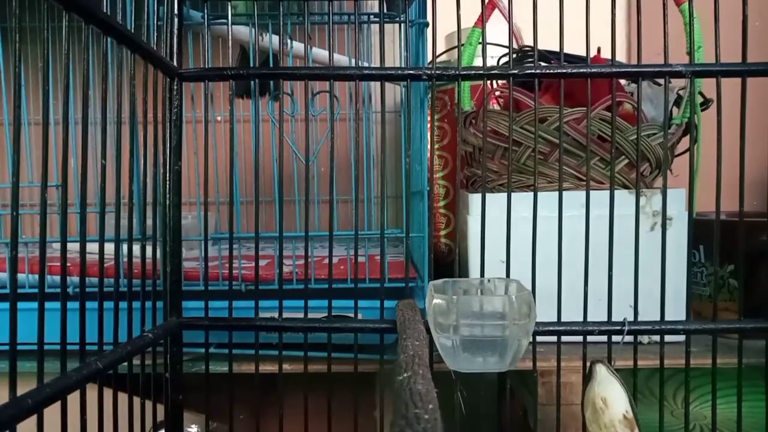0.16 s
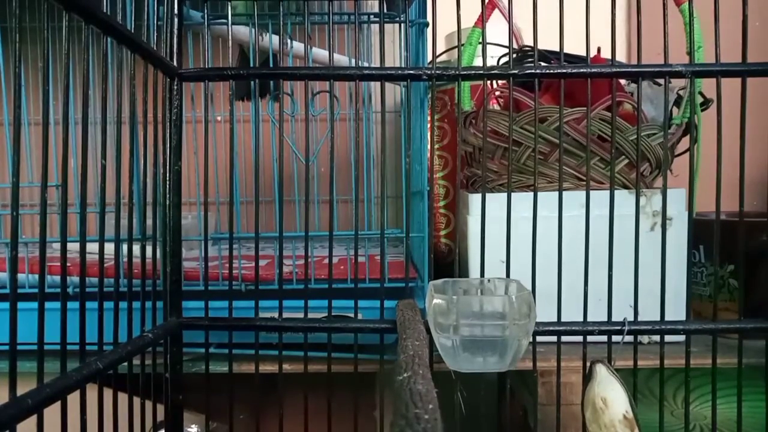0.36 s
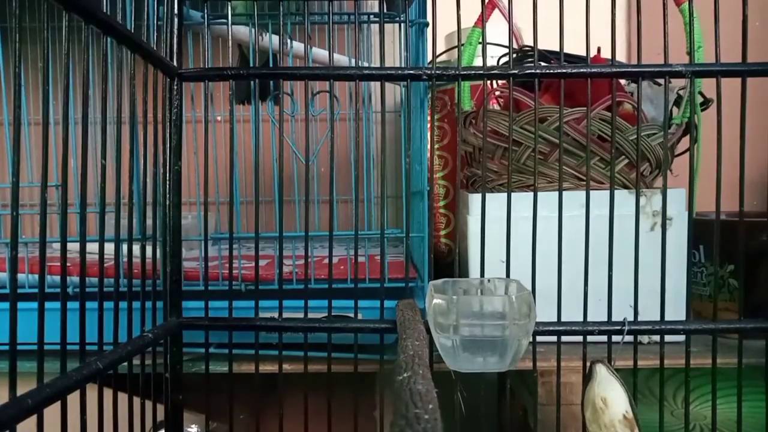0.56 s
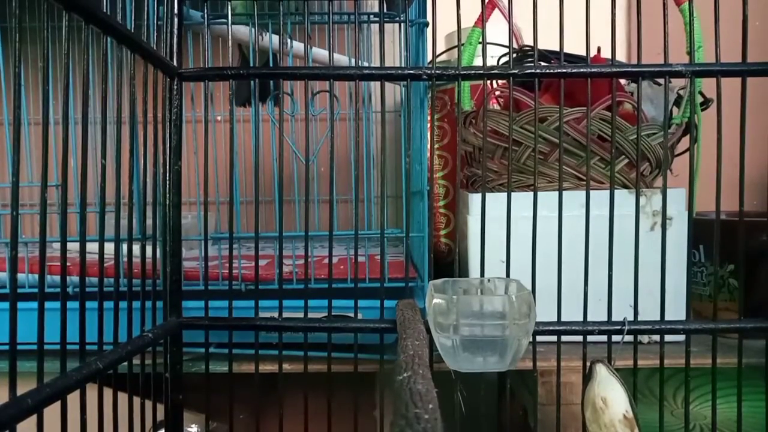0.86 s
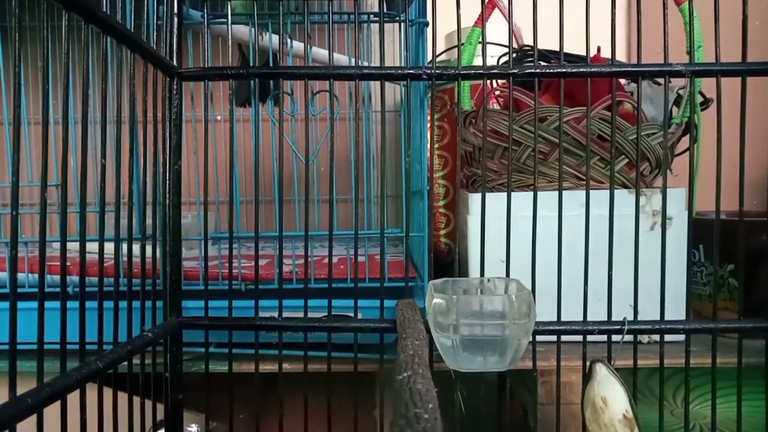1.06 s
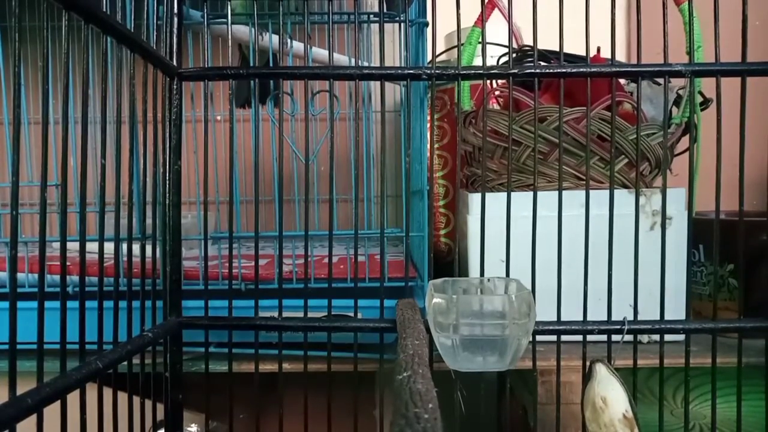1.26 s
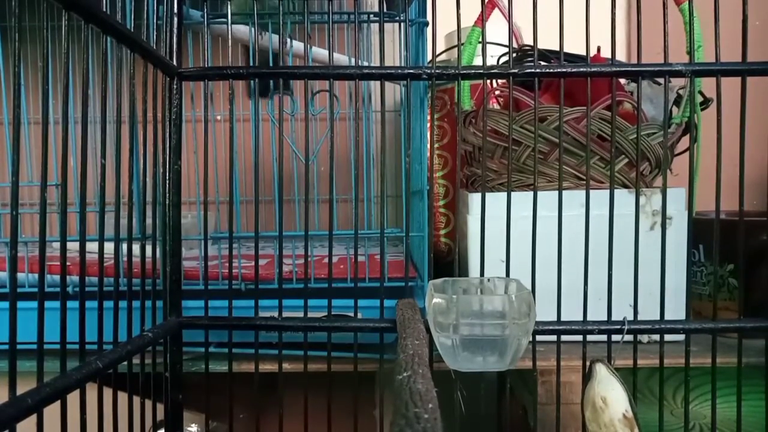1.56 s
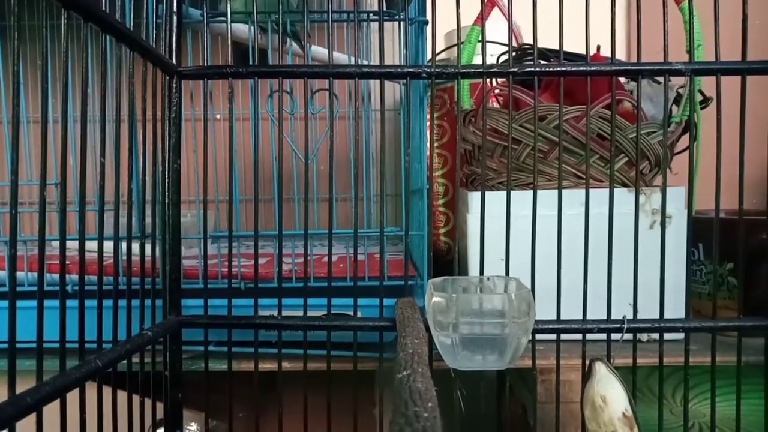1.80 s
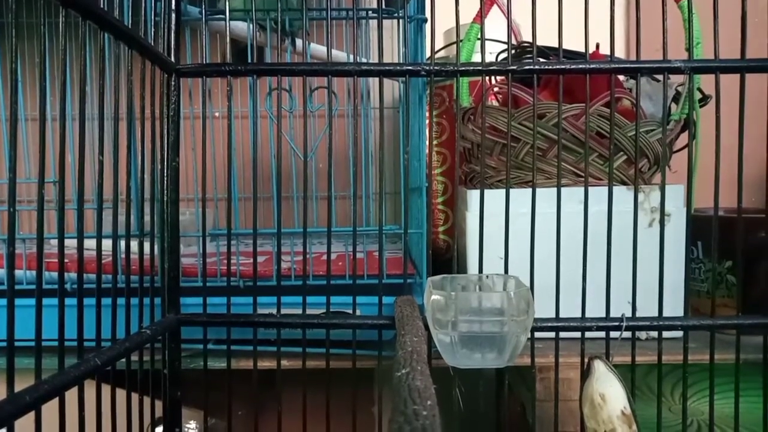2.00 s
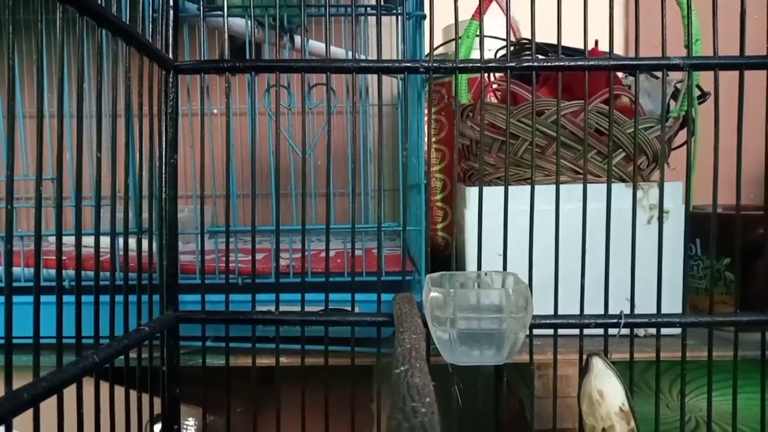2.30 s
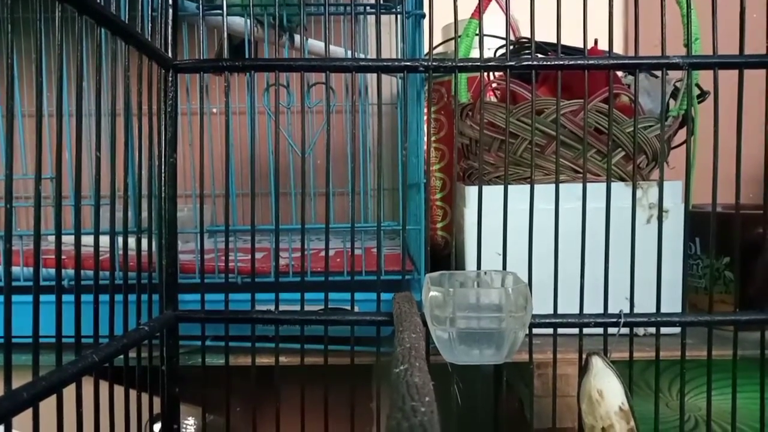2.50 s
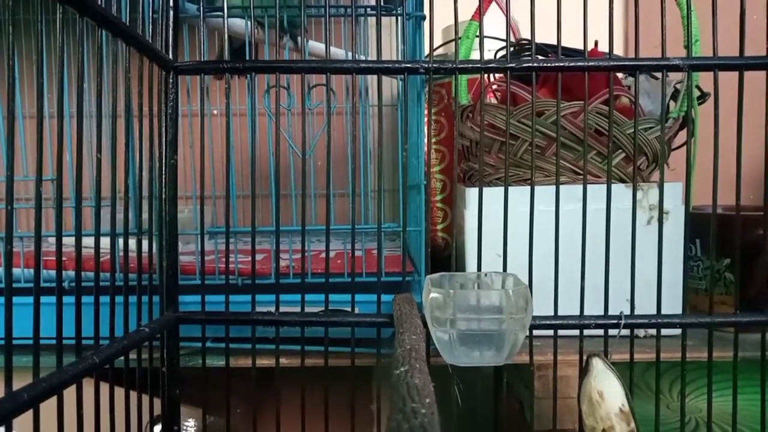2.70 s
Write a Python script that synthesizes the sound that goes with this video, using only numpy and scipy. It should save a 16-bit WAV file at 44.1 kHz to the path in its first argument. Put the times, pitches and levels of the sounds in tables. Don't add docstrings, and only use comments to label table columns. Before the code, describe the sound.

Close cage bird: a piercing whistle slides down, then five buzzy chirps over soft cage ticks

```python
import sys
import numpy as np
from scipy import signal
from scipy.io import wavfile
from scipy.ndimage import uniform_filter1d

SR = 44100
rng = np.random.default_rng(int(sys.argv[2]) if len(sys.argv) > 2 else 0)


def ratio(d):
    e = np.asarray(d, float) / 20
    return 10 ** e


def pcm_store(signal):
    levels = np.round(np.clip(np.atleast_2d(signal), -1, 1) * 32767)
    wavfile.write(sys.argv[1], SR, levels.astype(np.int16).T)


N = 125685
T = np.arange(N) / SR

# time_s, pitch_hz, fundamental_db, octave_db, double_octave_db
CALL_STRETCHES = [
    [(.2, 1785, -25, -54, -60), (.206, 1970, -8.5, -45, -33), (.211, 2330, -1.5, -38.5, -56.5),
     (.214, 2610, -11, -24, -59), (.222, 2684, -41, -9, -31.5), (.233, 2734, -30, -22.5, -41),
     (.241, 2606, -8, -4.5, -34), (.25, 2280, -2.5, -19, -29), (.259, 2023, -2.5, -7.5, -26)],
    [(.259, 2031, -1, -17.5, -28), (.264, 1965, -24, -7, -28), (.27, 1903, -25.5, -39.5, -23.5),
     (.278, 1812, -21, -5, -15), (.286, 1698, -29, -21, -27.5), (.29, 1601, -45, -5.5, -33),
     (.316, 1522, -50, -7.5, -25.5), (.319, 1462, -57.5, -21, -42), (.336, 1304, -68.5, -12.5, -58)],
]
# start_s, length_s, low_voice_hz, high_voice_hz, high_over_low_db
CHIRP_NOTES = [
    (1.744, .033, 3226, 3495, 0),
    (1.928, 0.031, 3244, 3550, -5.5),
    (2.128, 0.028, 3297, 3637, 4),
    (2.29, 0.03, 3232, 3532, -1.5),
    (2.525, 0.03, 3206, 3521, -1),
]


def unit(x):
    return x / np.sqrt(np.mean(x ** 2))


def band(x, hz, width, times=1):
    for _ in range(times):
        x = signal.lfilter(*signal.iirpeak(hz, hz / width, fs=SR), x)
    return x


def filtered(x, order, hz, kind="low"):
    return signal.sosfilt(signal.butter(order, hz, kind, fs=SR, output="sos"), x)


def walk(rate):
    k = int(SR / rate)
    held = np.repeat(rng.standard_normal(N // k + 1), k)
    return 1.4 * uniform_filter1d(uniform_filter1d(held, k), k)[:N]


def grains(shape, scatter_db):
    return unit(rng.standard_normal(shape) * ratio(scatter_db * rng.exponential(size=shape)))


def tone(hz):
    return 2 * np.pi * np.cumsum(hz) / SR


def swell(start, length):
    return np.sin(np.pi * np.clip((T - start) / length, 0, 1) ** 0.38)


def traffic():
    hum_hz, hum_width_hz = 102.2, 34.3
    # time_s, level_db
    swells = [(0.0, -44), (0.05, -55.5), (0.26, -34), (0.4, -49), (0.61, -41), (0.71, -47.5), (0.94, -41.5),
              (0.98, -57), (1.08, -41.5), (1.71, -41.5), (1.75, -54), (2.1, -50.5), (2.16, -68),
              (2.37, -64.5), (2.48, -41.5), (2.56, -59.5), (2.81, -45.5), (2.85, -61)]
    level_db = np.interp(T, *np.array(swells).T) + 1.5 * walk(15)
    return unit(band(rng.standard_normal(N), hum_hz, hum_width_hz)) * ratio(level_db)


def air():
    air_db, hiss_db = -46.5, -70
    # pitch_hz, density_db
    spectrum = [(25, -13), (110, 2.5), (300, -2.5), (1150, -13.5), (2600, -7.5), (4600, -68), (7500, -60),
                (8800, -85), (15000, -57)]
    hz_points, db_points = np.array(spectrum).T
    out, slow = 0, walk(1.0)
    for hz in 30 * 2 ** np.arange(0, 9.1, .5):
        db = np.interp(np.log(hz), np.log(hz_points), db_points) + 0.73 * slow + 1.5 * walk(4.7)
        out = out + ratio(db) * band(rng.standard_normal(N), hz, hz / 2, 2)
    hiss = unit(band(rng.standard_normal(N), 7400., 1800., 3))
    return unit(out) * ratio(air_db) + ratio(hiss_db + 2.5 * walk(6)) * hiss


def insect():
    insect_hz, width_hz, insect_db, octave_db = 5386, 100, -52.5, -31.5
    buzz = band(rng.standard_normal(N), insect_hz, 2 * width_hz, 2)
    octave = unit(band(buzz ** 2, 2 * insect_hz, 500.))
    return (unit(buzz) + ratio(octave_db) * octave) * ratio(insect_db + 1.46 * walk(40.1))


def far_birds():
    roughness, pitch_waver = .7, .028
    # start_s, length_s, from_hz, to_hz, level_db
    whistles = [(0.089, 0.17, 270, 441, -43), (0.13, 0.021, 5550, 5420, -41.5),
                (0.182, 0.026, 5810, 5600, -35.5), (.53, 0.044, 1664, 1620, -49),
                (0.531, 0.046, 3300, 3220, -41), (0.336, 0.082, 1515, 1476, -47.5),
                (0.531, 0.072, 3890, 3910, -43.5), (0.54, 0.048, 1990, 2010, -44.5),
                (0.545, 0.073, 2845, 2816, -40), (0.549, .09, 2536, 2580, -43.5),
                (0.581, 0.055, 1872, 1886, -43.5), (0.593, 0.042, 3740, 3730, -42),
                (0.598, 0.039, 2830, 2866, -42.5), (0.72, 0.023, 1580, 1510, -45),
                (1.616, 0.073, 3333, 3320, -43), (1.623, 0.053, 700, 670, -49),
                (1.961, .014, 2800, 2050, -27), (1.679, .02, 4250, 4250, -46),
                (1.695, 0.016, 687, 670, -35.5), (1.615, 0.022, 2200, 2200, -45.5),
                (1.63, 0.028, 5700, 5490, -53), (1.674, 0.075, 5550, 5270, -51.5),
                (2.138, 0.093, 1918, 2004, -46), (2.716, 0.026, 2075, 2100, -44),
                (2.647, 0.03, 945, 940, -53), (2.65, 0.068, 555.6, 565, -52.5),
                (2.698, 0.076, 760, 740, -53), (2.736, 0.043, 538, 550, -47)]
    out = 0
    for start, length, from_hz, to_hz, db in whistles:
        glide = from_hz + (to_hz - from_hz) * np.clip((T - start) / length, 0, 1)
        hz = glide * (1 + pitch_waver * walk(250))
        hoarse = 1 + roughness * walk(min(250, from_hz / 8))
        out = out + swell(start, length) * ratio(db) * hoarse * np.sin(tone(hz))
    return out


def yard(x):
    tail_db, tail_t60_s, treble_t60_s = -14.5, 0.43, 0.29
    early_db, early_t60_s, gap_s = -11.5, 0.073, .004
    u = T[:SR + SR // 2]

    def fade(t60):
        return ratio(-60 * u / t60) * (u > gap_s)

    noise = rng.standard_normal(len(u))
    soft = filtered(noise, 2, 4500)
    tail = soft * fade(tail_t60_s) + (noise - soft) * fade(treble_t60_s)
    early = grains(len(u), 4.1) * fade(early_t60_s)
    echoes = ratio(tail_db) * tail / np.linalg.norm(tail)
    echoes += ratio(early_db) * early / np.linalg.norm(early)
    return signal.fftconvolve(x, echoes)[:N]


def rustles():
    scatter_db, airy_db = 1.8, -32
    # start_s, length_s, level_db, centre_hz
    brushes = [(0.053, 0.28, -45.5, 2480), (0.526, 0.15, -38, 2800), (0.79, 0.032, -45.5, 1220),
               (0.913, 0.12, -39.5, 2600), (1.051, 0.15, -45.5, 2000), (1.299, 0.16, -39.5, 1620),
               (1.446, 0.17, -51, 1530), (1.6, 0.6, -45, 2480), (2.044, .15, -45, 4970),
               (1.818, 0.12, -44.5, 4440), (2.017, 0.2, -37.5, 4000), (2.657, 0.99, -48.5, 1930)]
    out = np.zeros(N)
    for start, length, db, hz in brushes:
        g = grains(N, scatter_db)
        body = unit(band(g, hz, 1.2 * hz, 3)) + ratio(airy_db) * g
        out += swell(start, length) * ratio(db + 1.5 * walk(60)) * body
    return out


def ticks():
    scatter_db, ring_width, wide_db, top_db, low_cut_hz = 4.5, .7, -1, -24, 420
    # start_s, peak_db, ring_hz, length_s
    claws = [(0.039, -25.5, 2070, 0.0047), (0.063, -26.5, 810, 0.0046), (0.085, -6.5, 1810, 0.006),
             (0.092, -18, 1950, 0.0038), (0.183, -19.5, 2100, 0.0029), (0.789, -30.5, 824, 0.0036),
             (0.824, -22, 802, 0.0062), (1.109, -15, 1510, 0.007), (1.249, -17.5, 1070, 0.0032),
             (1.306, -24, 2130, 0.016), (1.335, -12, 1520, 0.01), (1.344, -19, 1300, 0.0046),
             (1.364, -9.5, 1270, 0.0085), (1.372, -13.5, 620, 0.01), (1.39, -17.5, 2170, 0.0062),
             (1.453, -19, 1800, 0.003), (1.488, -18, 696, 0.0017), (1.537, -29, 3960, 0.004),
             (1.586, -18, 1500, 0.004), (1.471, -23.5, 1950, 0.005), (1.666, -27, 2170, 0.0043),
             (1.728, -15, 1900, 0.0019), (2.011, -20.5, 2040, 0.0039), (2.061, -24.5, 2430, 0.0036),
             (2.799, -21, 1840, 0.0035), (2.835, -9, 1315, 0.0067)]
    # start_s, peak_db, ring_hz, length_s
    knocks = [
        (0.283, -9.5, 710, 0.0037),
        (0.3, -7.5, 716, 0.0012),
    ]
    hits = claws + knocks
    out, u = np.zeros(N + 2000), np.arange(2000) / SR
    click = 6 * (abs(u - .0012) < .5 / SR)
    for (start, db, hz, length), g in zip(hits, grains((len(hits), 2000), scatter_db)):
        hit = (g + click) * np.exp(-u / max(length, 1e-3)) * np.clip(u / .0018, 0, 1)
        ring = unit(band(hit, hz, ring_width * hz, 2))
        ring += ratio(wide_db) * unit(band(hit, 790.0, 2900.0, 3))
        ring += ratio(top_db) * unit(hit)
        at = int(start * SR)
        out[at:at + 2000] += ring * ratio(db) / np.abs(ring).max()
    return filtered(out[:N], 3, low_cut_hz, "high")


def close_mic(small):
    return filtered(small, 6, 8600) + ratio(13) * band(small, 22000.0, 2800.0)


def gain_control():
    quick_db, quick_s, slow_db, slow_s = -11.5, 0.078, -5.5, 0.13
    ahead_s, call_share = .006, -2 / -11.5
    call_start, call_end = CALL_STRETCHES[0][0][0], CALL_STRETCHES[1][-1][0]
    notes = [(c[0], c[1], 1) for c in CHIRP_NOTES]
    notes.append((call_start, call_end - call_start, call_share))
    drops = []
    for start, length, share in notes:
        after = np.clip(T - start - length, 0, 9)
        back = quick_db * np.exp(-after / quick_s) + slow_db * np.exp(-after / slow_s)
        drops.append(share * np.clip((T - start + ahead_s) / 0.0015, 0, 1) * back)
    return ratio(np.min(drops, axis=0))


def thrown(call):
    throw_hz, leak_db, sway = 2550, -17, .6
    high = filtered(call, 4, throw_hz, "high")
    return (high + ratio(leak_db) * call) * (1 + sway * walk(500))


def chirps():
    chirp_db, rise_share, rise_power, fall_s = -2, 0.54, 1.26, 0.006
    tail_db, tail_s = -13, 0.0056
    scoop_hz, scoop_s, sag_hz = 450, .004, 60
    step_hz, step_share, step_s = 199, 0.65, .001
    breath_db, bright_s = -30, 0.0064
    mixes = [(2, 0), (1, 1), (0, 2), (2, -1), (-1, 2), (3, 0), (2, 1), (0, 3)]
    mixes_db = [-30, -35, -30, -30.5, -27, -41.5, -55, -41.5]
    out = np.zeros(N)
    breath = unit(band(rng.standard_normal(N), 2850.0, 1200.0, 2))
    waver = [ratio(5.05 * walk(400)) for _ in mixes]
    for start, length, low_hz, high_hz, high_db in CHIRP_NOTES:
        u = T - start
        since, done = np.clip(u, 0, 1), np.clip(u / length, 0, 1)
        rise = np.clip(u / (rise_share * length), 0, 1) ** rise_power
        tail = ratio(tail_db) * np.exp(-np.clip(u - length, 0, 1) / tail_s)
        env = rise * np.maximum(np.clip((length - u) / fall_s, 0, 1), tail)
        scoop = scoop_hz * np.exp(-since / scoop_s) + sag_hz * done ** 4
        step = step_hz / (1 + np.exp(-np.clip((u - step_share * length) / step_s, -30, 30)))
        low = tone((low_hz - scoop) * (1 + 0.0064 * walk(400)))
        high = tone((high_hz + step - scoop) * (1 + 0.0064 * walk(400)))
        wave = ratio(1.5 * walk(200) - high_db / 2) * np.sin(low)
        wave += ratio(1.5 * walk(200) + high_db / 2) * np.sin(high)
        mixed = sum(ratio(db) * w * np.sin(a * low + b * high)
                    for (a, b), db, w in zip(mixes, mixes_db, waver))
        bright = 1 + 2 * np.exp(-since / bright_s)
        out += env * ratio(chirp_db) * (wave + bright * mixed + ratio(breath_db) * breath)
    return out


def voice(rows):
    roughness, jitter, breath_db, roll_hz = .22, .005, -25, 11000
    fade_hz, fade_full_db = 1950, -12
    # multiple, level_db
    overtones = [(3, -24), (5, -31), (6, -38), (7, -44)]
    s, hz, low_db, octave_db, top_db = np.array(rows).T
    pitch = np.interp(T, s, hz)
    phase = tone(pitch * (1 + jitter * walk(400)))
    on = np.clip(np.minimum(T - s[0], s[-1] - T) / 0.0017, 0, 1)
    low, octave, top = (np.sqrt(2) * on * ratio(np.interp(T, s, d)) for d in (low_db, octave_db, top_db))
    out = low * np.sin(phase) + top * np.sin(4 * phase)
    out += octave * np.sin(2 * phase) * (1 + roughness * walk(500))
    fade_db = fade_full_db * np.clip((fade_hz - pitch) / 150, 0, 1)
    for k, db in overtones:
        level = np.maximum(low, octave) * ratio(db + fade_db + 1.5 * walk(150))
        out += level * np.sin(k * phase) / (1 + (k * pitch / roll_hz) ** 4)
    breath = unit(band(rng.standard_normal(N), 3400.0, 3300.0))
    return out + ratio(breath_db) * (low + octave) * breath


def arched_call():
    # time_s, pitch_hz, fundamental_db, octave_db, double_octave_db
    other_side = [
        (.212, 2724, -41, -38, -67),
        (.217, 2850, -10, -24, -61),
        (.222, 3035, -28.5, -18, -59),
        (.23, 2860, -37, -21.5, -58),
        (.238, 2780, -38, -38, -58),
    ]
    return voice(CALL_STRETCHES[0]) + voice(CALL_STRETCHES[1]) + voice(other_side)


def scene():
    call, run, far = arched_call(), chirps(), far_birds()
    small = close_mic(ticks() + rustles())
    sway = 1 + .33 * walk(350)
    sent = ratio(7.5) * thrown(call) + ratio(10.5) * run + ratio(14.0) * far
    wet = yard(sent * sway + ratio(-1.5) * small)
    behind = wet + small + ratio(-6) * far + air() + insect()
    return (call + run + gain_control() * behind + traffic())[None]


def roll_off(x):
    return signal.sosfilt(signal.butter(12, 15730, fs=SR, output="sos"), x)


def record(dry):
    clip, knee, top_hz = 1.0, 9, 15700
    squashed = dry / (1 + np.abs(dry / clip) ** knee) ** (1 / knee)
    x = signal.sosfilt(signal.ellip(8, .2, 70, top_hz, fs=SR, output="sos"), squashed)
    return roll_off(x)


dry = scene()
out = record(dry)
pcm_store(out)
```